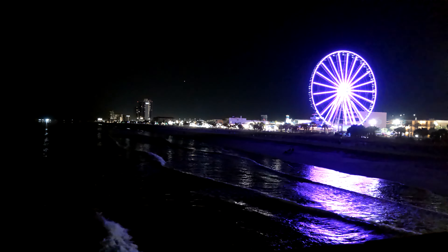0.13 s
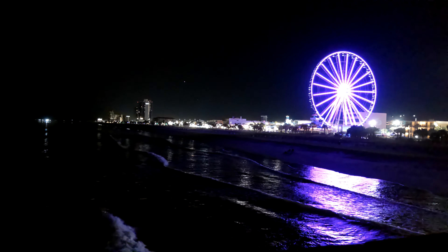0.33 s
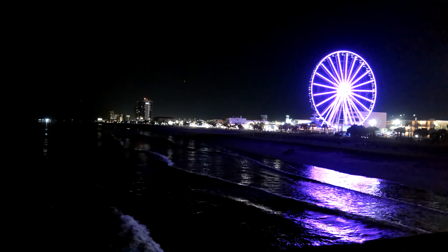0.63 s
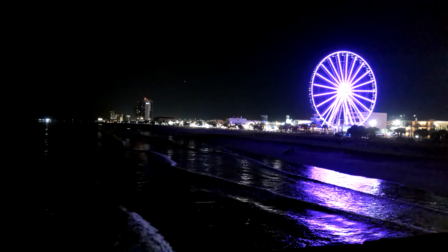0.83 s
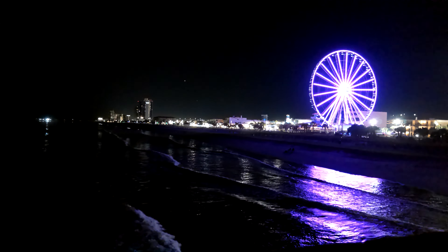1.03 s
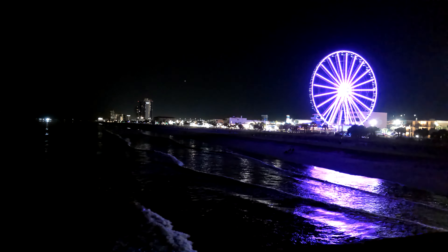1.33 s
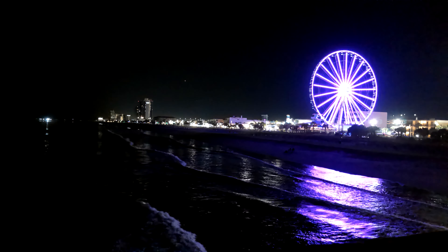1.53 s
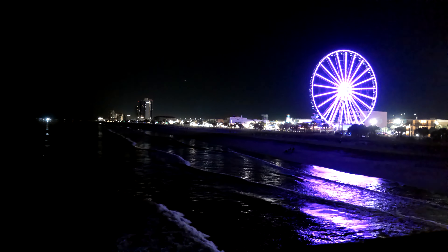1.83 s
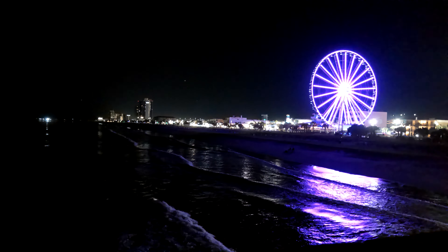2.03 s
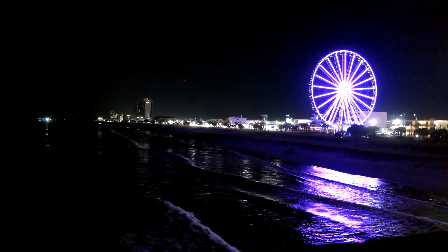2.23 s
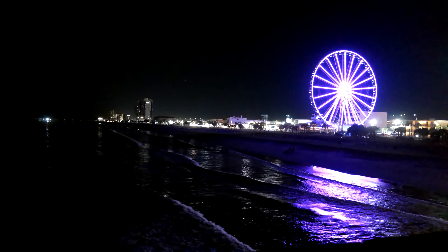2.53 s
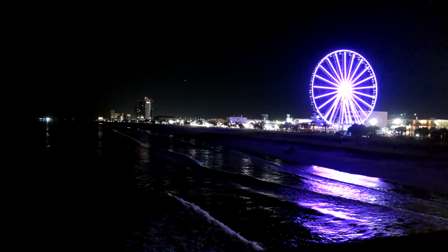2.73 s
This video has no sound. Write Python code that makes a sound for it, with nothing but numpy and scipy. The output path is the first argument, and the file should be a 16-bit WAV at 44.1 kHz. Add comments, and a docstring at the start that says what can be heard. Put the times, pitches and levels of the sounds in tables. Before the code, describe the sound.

A broken wave is already roaring at 0 s, deep and muffled, strongest until about 0.3 s, then sinking unevenly to a quieter wash by 2.9 s. Much softer foam hisses and fizzes above it, with small splashes near 0.5-0.7, 1.1 and 1.6-1.7 s. A tiny, bright, rattling tick sounds close by at 1.1 s. Low wind and far traffic rumble below, with faint open-sea hiss behind.

```python
"""Night surf from a pier

A broken wave (shaped noise) roars and dies away; its foam (smooth noise, fizzing pops, short narrow
splashes) hisses up the sand. One small tick (noise puffs, ringing modes) sounds near the microphone.
Below lies a low noise rumble of wind and far traffic, behind it the even hiss of the open sea.
A hard surface close by repeats the shore within two milliseconds, which ripples its tone."""
import sys
import numpy as np
from scipy import signal
from scipy.io import wavfile
from scipy.ndimage import uniform_filter1d

SR = 44100
rng = np.random.default_rng(int(sys.argv[2]) if len(sys.argv) > 2 else 0)


def master_out(mix):
    """Clip the mix to full scale and print it as 16-bit PCM to the path in sys.argv[1]."""
    frames = np.transpose(np.atleast_2d(mix))
    ceiling = np.clip(frames, -1, 1)
    pcm = np.round(ceiling * 32767).astype(np.int16)
    wavfile.write(sys.argv[1], SR, pcm)


def elevation(decibels):
    """Turn decibel levels (scalar or array-like) into linear amplitude ratios."""
    levels = np.asarray(decibels, float)
    return 10 ** (levels / 20)


N = 126567

# breaking wave strength before trim: (time [s], level [dB])
WAVE_LEVEL = [(0, -17), (.12, -16.5), (.27, -17), (.32, -19.5), (.45, -19), (.7, -20), (.97, -19),
              (1.06, -19), (1.4, -20.5), (1.6, -21.5), (1.8, -22), (2.1, -23), (2.5, -23.5), (2.87, -23.5)]
# relative spectrum of the roar: (frequency [Hz], density [dB per Hz])
ROAR_TONE = [(40, -23), (110, -5.5), (190, -1), (360, -0.5), (450, -6), (600, -9.5), (880, -19.5),
             (1200, -16.5), (1300, -22.5), (1450, -32), (2300, -37.5), (5000, -80)]
# foam running up the sand, before trim: (time [s], level [dB])
FOAM_LEVEL = [(0, -37.5), (.15, -37), (.3, -37.5), (.6, -37.5), (.8, -38), (.95, -39.5), (1.2, -39.5),
              (1.4, -40.5), (1.48, -40), (1.6, -41.5), (1.72, -40.5), (1.8, -42.5), (2.2, -42.5),
              (2.5, -43.5), (2.87, -45)]
# relative spectrum of the foam hiss: (frequency [Hz], density [dB per Hz])
HISS_TONE = [(600, -13.5), (1200, -2), (1800, 0), (2400, 0), (2550, -5.5), (2900, -2.5), (3600, -8),
             (3750, -9), (4050, -9.5), (4600, -7), (5050, -19.5), (5350, -15.5), (5900, -20), (6300, -21),
             (7200, -22.5), (7800, -28.5), (10000, -31), (12000, -34.5), (13000, -45), (15700, -44)]
# small splashes in the foam: (time [s], level [dB], centre frequency [Hz])
SPLASHES = [(.487, -37, 2200), (.55, -39, 2800), (.70, -39, 3000), (1.082, -38, 2200), (1.58, -41.5, 3600),
            (1.65, -41, 3500), (1.71, -42, 3300)]
# taps of the tick: (time [s], level [dB])
TICK_TAPS = [(1.1141, -32), (1.1164, -33.5), (1.1186, -43)]
# ringing modes of the tick: (frequency [Hz], level re tap [dB], T60 [s], lag [s])
TICK_MODES = [(4280, 6.5, 0.011, 0), (2200, 3.5, .018, .0022), (4720, 2, .011, 0), (8050, -8, .01, .0008),
              (8950, -5, .014, .001)]
# relative spectrum of the rumble: (frequency [Hz], density [dB per Hz])
RUMBLE_TONE = [(10, -28), (22, 3), (60, 11), (110, 5.5), (200, -14), (400, -45)]
# relative spectrum of the open sea: (frequency [Hz], density [dB per Hz])
SEA_TONE = [(3000, -4), (6000, 10), (9000, -3), (11500, -2), (12200, -7), (14500, -6), (15700, -2)]
# near reflections: (delay [s], share of the direct sound [ratio])
ECHOES = [(0.00173, 0.19), (0.00088, 0.047)]

WAVE_TRIM_DB, FOAM_TRIM_DB = 0.5, 2
FIZZ_RE_HISS_DB, POPS_PER_S, POP_SPREAD_DB = -11.5, 2300, -2.5
SPLASH_RISE_S, SPLASH_T60_S, SPLASH_EDGE_RATIO = 0.005, 0.08, 1.3
PUFF_T60_S, PUFF_RE_TAP_DB, PUFF_LOW_HZ, PUFF_HIGH_HZ = 0.013, -5.5, 6400, 11000
TAP_RISE_S = 0.0005
RUMBLE_DB, RUMBLE_DB_PER_WAVE_DB = -30, 0.4
SEA_DB, SEA_DB_PER_FOAM_DB = -68, 0.5
ECHO_LOW_HZ, ECHO_HIGH_HZ = 670, 6000
EDGE_HZ = 15760


def evened(x):
    """Scales to rms 1."""
    return x / np.sqrt(np.mean(x ** 2) + 1e-20)


def tone(points, hz):
    """Reads a spectrum in dB on a log-frequency axis."""
    f, db = np.transpose(points)
    return np.interp(np.log(hz + 1), np.log(f + 1), db)


def level(points):
    """Reads a level curve in dB at every sample."""
    return np.interp(np.arange(N) / SR, *np.transpose(points))


def wash(points, patchy_db, swell_db, flicker_db, size):
    """Random STFT noise of a given tone: drifting patches, plus a slow swell and flicker of all bands."""
    frames = 4 * N // size + 10
    hz = np.fft.rfftfreq(size, 1 / SR)
    real, imag, patches = rng.standard_normal((frames, len(hz), 3)).T
    # patches: axis 0 is frequency, axis 1 time
    patches = uniform_filter1d(patches, size=size // 80, axis=0)
    patches = evened(uniform_filter1d(patches, size=8, axis=1))
    slow, quick = rng.standard_normal((frames, 2)).T
    moves_db = swell_db * evened(uniform_filter1d(slow, size=24)) + flicker_db * quick
    gain_db = tone(points, hz)[:, None] + patchy_db * patches + moves_db
    spectra = (real + 1j * imag) * elevation(gain_db)
    noise = signal.istft(spectra, nperseg=size, noverlap=3 * size // 4)[1]
    return evened(noise[size:][:N])


def roar():
    """Tumbling water of the broken wave: noise, mostly low, that follows the wave level."""
    noise = wash(ROAR_TONE, patchy_db=0.37, swell_db=0.1, flicker_db=0.32, size=1024)
    return elevation(level(WAVE_LEVEL) + WAVE_TRIM_DB) * noise


def fizz():
    """Single nearer bubble pops: random impulses of either sign, filtered to the hiss tone."""
    size_db = POP_SPREAD_DB * np.minimum(rng.exponential(1, N), 5)
    pops = elevation(size_db) * (rng.random(N) < POPS_PER_S / SR)
    pops *= rng.choice([-1., 1.], N)
    gain = elevation(tone(HISS_TONE, np.fft.rfftfreq(N, 1 / SR)))
    return evened(np.fft.irfft(np.fft.rfft(pops) * gain, N))


def foam():
    """Countless far bubbles merge into smooth hiss, over a faint fizz of nearer pops."""
    hiss = wash(HISS_TONE, patchy_db=1.05, swell_db=0.27, flicker_db=0.5, size=512)
    return elevation(level(FOAM_LEVEL) + FOAM_TRIM_DB) * (hiss + elevation(FIZZ_RE_HISS_DB) * fizz())


def splashes():
    """Collapsing tongues of foam: short decaying bursts of band-passed noise."""
    t, out = np.arange(3000) / SR, np.zeros(N)
    shape = np.minimum(t / SPLASH_RISE_S, 1) * elevation(-60 * t / SPLASH_T60_S)
    for time_s, db, hz in SPLASHES:
        edges_hz = [hz / SPLASH_EDGE_RATIO, hz * SPLASH_EDGE_RATIO]
        band = signal.butter(1, edges_hz, "band", fs=SR)
        burst = evened(signal.lfilter(*band, rng.standard_normal(3000)))
        out[round(time_s * SR):][:3000] += elevation(db) * shape * burst
    return out


def tick():
    """Small hard snap that rattles twice more: bright noise puffs and short rings, the lowest latest."""
    t, out = np.arange(1500) / SR, np.zeros(N)
    band = signal.butter(1, [PUFF_LOW_HZ, PUFF_HIGH_HZ], "band", fs=SR)
    ring = np.zeros(1500)
    for hz, db, t60_s, lag_s in TICK_MODES:
        since_s = t - lag_s
        ring += elevation(db - 60 * since_s / t60_s) * (since_s >= 0) * np.sin(2 * np.pi * hz * since_s)
    rise = np.minimum(t / TAP_RISE_S, 1)
    for time_s, db in TICK_TAPS:
        noise = evened(signal.lfilter(*band, rng.standard_normal(1500)))
        puff = noise * elevation(PUFF_RE_TAP_DB - 60 * t / PUFF_T60_S)
        out[round(time_s * SR):][:1500] += elevation(db) * rise * (puff + ring)
    return out


def rumble():
    """Wind and far traffic: lumpy low noise, partly sinking with the smoothed wave level."""
    wave_db = level(WAVE_LEVEL)
    follow_db = RUMBLE_DB_PER_WAVE_DB * uniform_filter1d(wave_db - wave_db.mean(), size=12000)
    lumps = wash(RUMBLE_TONE, patchy_db=0.5, swell_db=0.4, flicker_db=0.5, size=2048)
    return elevation(RUMBLE_DB + follow_db) * lumps


def open_sea():
    """Far water: faint treble noise, partly sinking with the foam level."""
    foam_db = level(FOAM_LEVEL)
    follow_db = SEA_DB_PER_FOAM_DB * (foam_db - foam_db.mean())
    hiss = wash(SEA_TONE, patchy_db=1.1, swell_db=0.4, flicker_db=1.2, size=512)
    return elevation(SEA_DB + follow_db) * hiss


def near_surface(x):
    """Short reflections, strongest at middle frequencies, comb the spectrum."""
    hz = np.fft.rfftfreq(N, 1 / SR)
    low_cut = 1 / (1 + (ECHO_LOW_HZ / (hz + 1)) ** 4)
    high_cut = 1 / (1 + (hz / ECHO_HIGH_HZ) ** 2)
    delayed = sum(share * np.exp(-2j * np.pi * hz * delay_s) for delay_s, share in ECHOES)
    return np.fft.irfft(np.fft.rfft(x) * (1 + low_cut * high_cut * delayed), N)


def scene():
    """The shore through the near reflections, plus the direct tick; one channel."""
    shore = roar() + foam() + splashes() + rumble() + open_sea()
    return (near_surface(shore) + tick())[None]


def roll_off(x):
    """The treble ends steeply here."""
    return signal.sosfilt(signal.butter(12, 16120, fs=SR, output="sos"), x)


def record(dry):
    """The recorder's band limit: a steep linear-phase low-pass."""
    edge = signal.firwin(1023, EDGE_HZ, window=("kaiser", 9), fs=SR)
    mix = signal.oaconvolve(dry, edge[None], "same")
    return roll_off(mix)


dry = scene()
out = record(dry)
master_out(out)
```